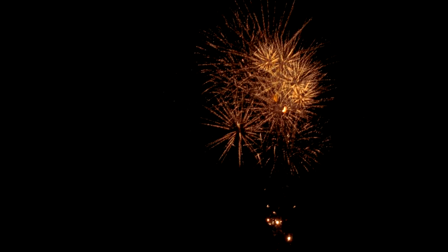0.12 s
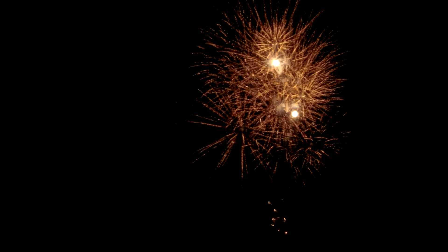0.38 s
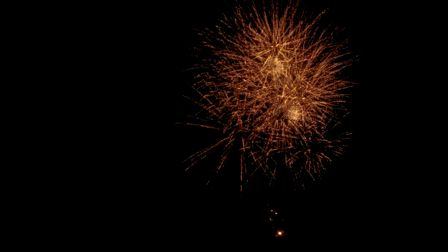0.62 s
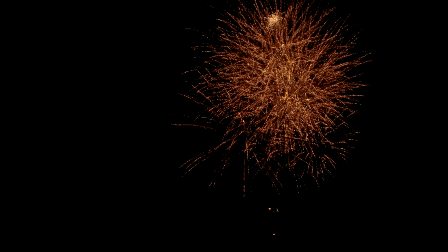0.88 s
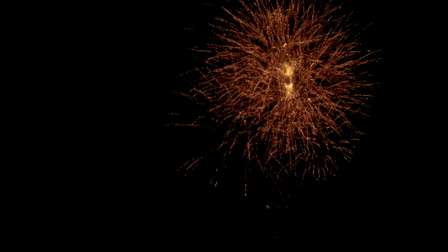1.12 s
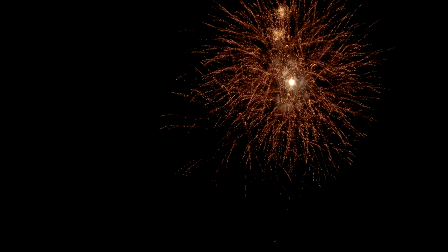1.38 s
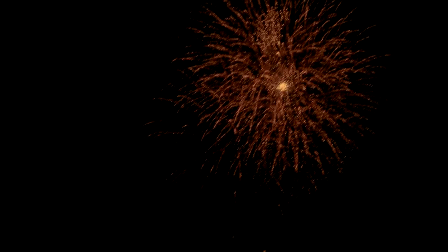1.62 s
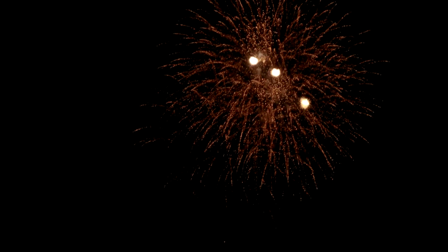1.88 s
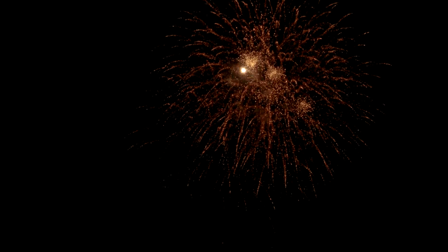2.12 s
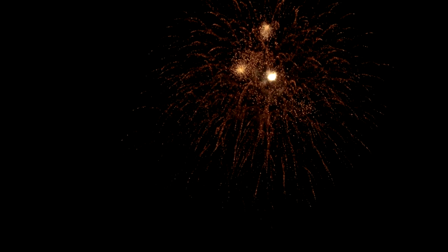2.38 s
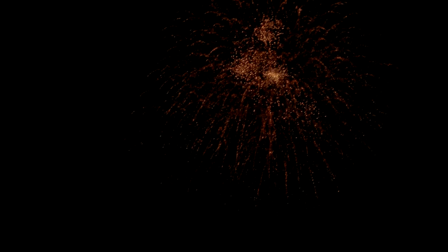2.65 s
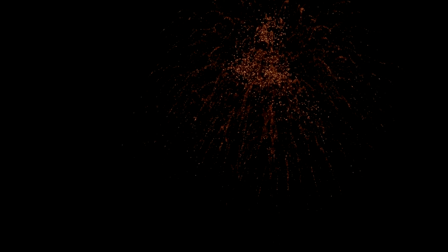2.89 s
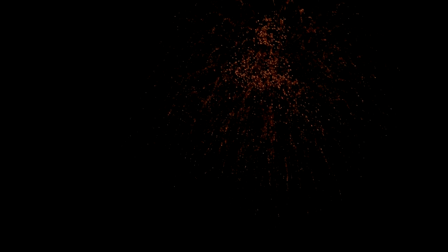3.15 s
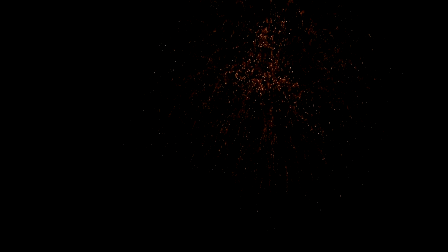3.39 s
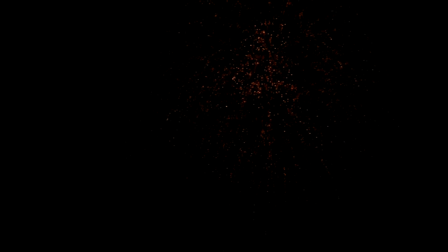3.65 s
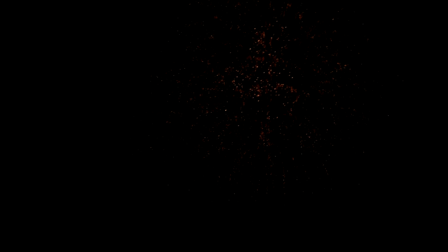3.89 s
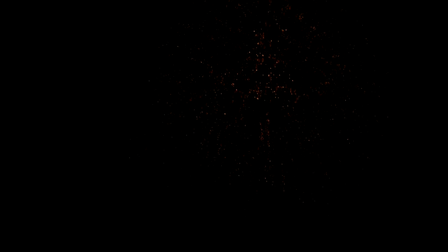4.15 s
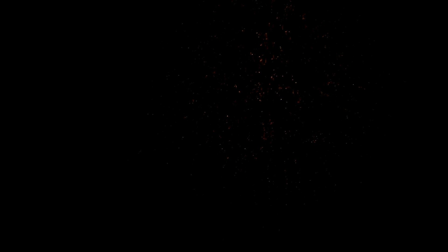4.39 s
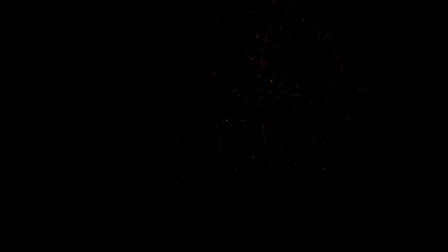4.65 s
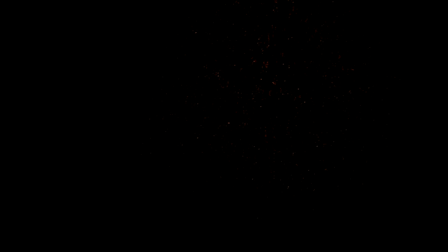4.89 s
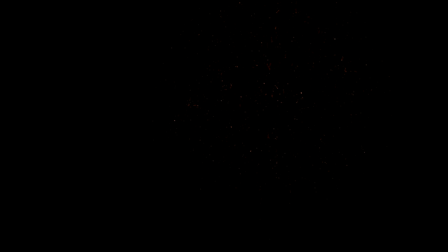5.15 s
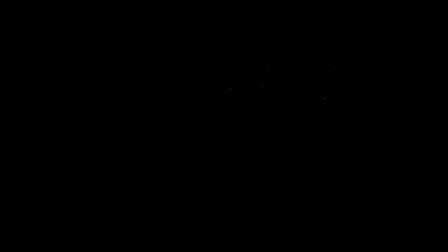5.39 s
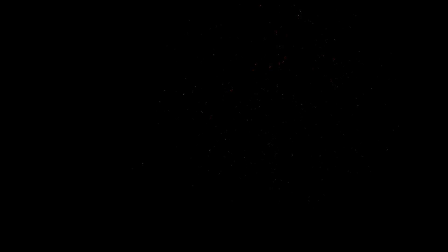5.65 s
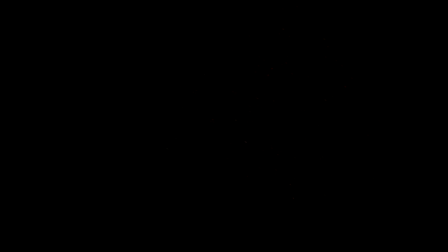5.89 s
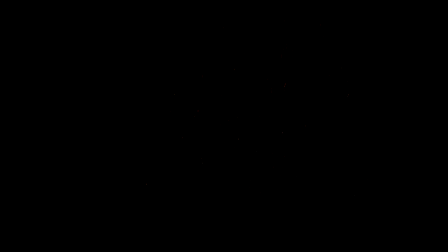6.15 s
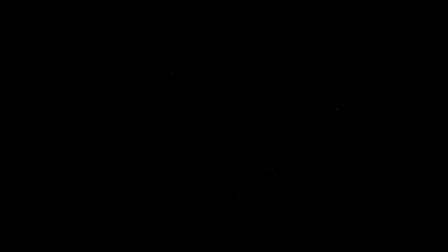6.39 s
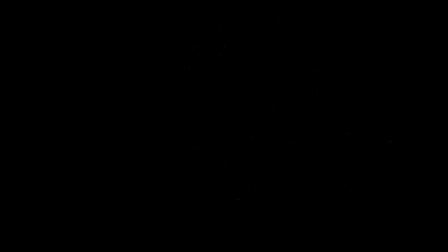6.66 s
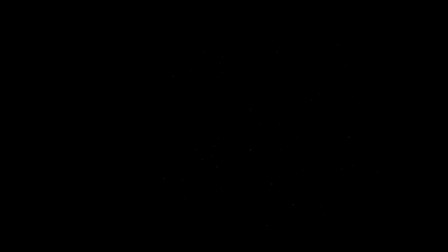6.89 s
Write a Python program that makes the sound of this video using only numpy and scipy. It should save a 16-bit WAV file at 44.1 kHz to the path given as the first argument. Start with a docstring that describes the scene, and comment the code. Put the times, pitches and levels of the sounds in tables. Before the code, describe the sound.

Open land among hills on a summer night, heard by a small stereo microphone. From 0 to 1.35 s, a low roll from earlier bursts fades under short raspy katydid buzzes, a faint pulsed cricket and a grainy high insect hiss. A thin, breathy whistle sinks in pitch from 0.5 s, joined by another near 0.95 s; both swell and stop at 1.36 s. Then overhead shells bang in rapid, uneven succession until about 2.7 s: short, hard, dry cracks, some clipping, each with a tight wall slap and scattered land echoes. Weaker bangs follow more sparsely, with strong ones near 3.7 and 4.3 s, the last at 4.9 s. Dull, soft thumps return from far slopes between 2.1 and 5.7 s. The hills' midrange roll slowly dies until 7 s, while katydid buzzes and the bright insect hiss grow clear again over a distant hush.

```python
"""Open land between echoing hills on a summer night: aerial shells burst far overhead.
Each bang is a short blast wave with a ground bounce, a slap from a wall close by, and land echoes shaped
from noise; dull thumps return from far slopes. Two narrow bands of noise whistle before the first bang.
Tooth strikes ringing in wings make katydids, pulsed noise a cricket, grainy treble noise an insect chorus.
Under it lie a long roll from the hills and a distant hush, heard by a small two-port microphone."""
import sys
import numpy as np
from scipy import signal
from scipy.fft import rfft, irfft, next_fast_len
from scipy.io import wavfile
from scipy.ndimage import uniform_filter1d

SR = 44100
rng = np.random.default_rng(int(sys.argv[2]) if len(sys.argv) > 2 else 0)


def to_linear_factor(level_db):
    """Convert decibel levels (scalar or array-like) to linear amplitude factors."""
    exponent = np.asarray(level_db, float) / 20
    return 10 ** exponent


def log_audio(samples):
    """Write samples as a 16-bit WAV file to the path given in sys.argv[1]."""
    # one column per channel
    frames = np.atleast_2d(samples).T
    # limit to full scale, then quantise
    limited = np.clip(frames, -1, 1)
    pcm = np.round(limited * 32767).astype(np.int16)
    wavfile.write(sys.argv[1], SR, pcm)


N = 309870  # samples in the scene


def evened(x):
    """Scales to rms 1."""
    return x / np.sqrt(np.mean(x ** 2) + 1e-20)


def read(hz, points, column=1):
    """Reads a spectrum table on a log-frequency axis."""
    rows = np.array(points)
    return np.interp(np.log(hz + 1), np.log(rows[:, 0] + 1), rows[:, column])


def curve(rows):
    """Reads a time table at every sample."""
    times, values = np.transpose(rows)
    return np.interp(np.arange(N) / SR, times, values)


def add(mix, s, sound):
    """Mixes a sound in from second s."""
    part = mix[max(round(s * SR), 0):][:len(sound)]
    part += sound[:len(part)]


def soften(x, ms):
    """Rounds sharp corners with one-pole smoothing."""
    r = np.exp(-1000 / (SR * max(ms, .005)))
    return signal.lfilter([1 - r], [1, -r], x)


def resonate(x, hz, width):
    """Rings like a struck body: a resonance of gain 1 that can follow a pitch curve."""
    turn = np.exp(2j * np.pi * np.cumsum(hz * np.ones(len(x))) / SR)
    r = np.exp(-np.pi * width / SR)
    # shift the pitch down to 0 Hz, smooth, and shift it back up
    return 2 * (turn * signal.lfilter([1 - r], [1, -r], x / turn)).real


def noise_pair(shape, same, count=N, size=1024):
    """Two noise channels with magnitude shape(Hz, s) and a given left-right likeness."""
    hop = size // 4
    frames = count // hop + 5
    hz = np.fft.rfftfreq(size, 1 / SR)
    a, b, c, d = rng.standard_normal((frames, len(hz), 4)).T
    like = np.clip(read(hz, same), -1, 1)[:, None]
    left = a + 1j * b
    right = like * left + np.sqrt(1 - like ** 2) * (c + 1j * d)
    pair = np.array([left, right]) * shape(hz[:, None], np.arange(frames) * hop / SR)
    return signal.istft(pair, nperseg=size, noverlap=size - hop)[1][:, :count]


def patchy(spectrum, patchy_db):
    """A spectrum with drifting louder and softer patches."""
    field = rng.standard_normal((N // 256 + 5, 513)).T
    field = evened(uniform_filter1d(uniform_filter1d(field, 8, 0), 8, 1))
    return lambda hz, s: to_linear_factor(read(hz, spectrum) + patchy_db * field)


def causal(points, size=1024):
    """The shortest click that has a given spectrum (minimum phase)."""
    log_gain = np.log(to_linear_factor(read(abs(np.fft.fftfreq(size, 1 / SR)), points)))
    return np.fft.ifft(np.exp(np.conj(signal.hilbert(log_gain)))).real[:size // 2]


# colour of the hush: (frequency [Hz], relative level [dB])
HUSH_COLOUR = [(15, -35), (25, -7.5), (223, -7.5), (575, -1), (1650, -9.5), (2690, -7), (3250, -12.5),
               (4030, -14.5), (5430, -18.5), (5880, -16.5), (7920, -16), (14800, -12.5), (16000, -11.5)]
# how alike left and right are: (frequency [Hz], likeness [0 to 1])
HUSH_LIKENESS = [(30, .3), (130, 0.41), (700, 0.44), (1500, 0.54), (3500, 0.2), (8000, 0.25), (15000, 0.89)]


def night():
    """A distant hush: shaped noise with small drifting patches."""
    return to_linear_factor(-56) * evened(noise_pair(patchy(HUSH_COLOUR, patchy_db=1.2), HUSH_LIKENESS))


# rise and fall of the insect hiss: (time [s], level [dB])
CHORUS_LEVEL = [(0.0, -54), (0.98, -58), (1.35, -56), (2.89, -69), (4.05, -63.5), (4.4, -64), (5.64, -56),
                (6.4, -52), (7.03, -51)]


def chorus():
    """Many far insects merge into a grainy high hiss: noise of uneven strength, ringing near 15 kHz."""
    grain_db = 2.1 * np.minimum(rng.exponential(1, (N, 2)).T, 6)
    ticks = to_linear_factor(grain_db) * rng.standard_normal((N, 2)).T
    ticks[1] = 0.3 * ticks[0] + 0.85 * ticks[1]  # the sides share some ticks
    hiss = np.array([resonate(resonate(side, 14600, 1700), 15200, 1800) for side in ticks])
    return to_linear_factor(curve(CHORUS_LEVEL)) * evened(hiss)


def cricket():
    """A thin, slightly fuzzy tone pulsed about forty times a second, its level wandering a little."""
    t = np.arange(N) / SR
    beat_drift, level_drift_db = evened(uniform_filter1d(rng.standard_normal((N, 2)), 9000, 0)).T
    beat = np.sin(2 * np.pi * (40 * t + 0.72 * beat_drift))
    pulses = np.clip(beat + 1.1, .35, 1)
    tone = evened(resonate(resonate(rng.standard_normal(N), 5879, 50), 5879, 50))
    return to_linear_factor(-73 + level_drift_db) * pulses * tone


# katydid buzzes: (middle [s], length [s], level before fading in and out [dB])
BUZZES = [(0.05, 0.11, -52.5), (.43, 0.14, -50.5), (.57, 0.13, -57), (.73, 0.14, -49.5), (.96, 0.12, -48),
          (1.08, 0.16, -57), (1.28, 0.27, -57), (1.45, 0.15, -53), (1.56, 0.13, -52), (1.78, 0.17, -61),
          (2.17, 0.15, -60), (2.85, .09, -63), (4.22, .09, -59), (4.93, 0.079, -61), (5.1, .12, -61),
          (5.61, .11, -57), (5.76, 0.036, -55), (5.92, 0.068, -57.5), (6.16, 0.16, -56.5),
          (6.29, 0.14, -50.5), (6.58, 0.24, -59), (6.72, 0.23, -53.5), (7.02, 0.076, -52)]
# ringing of the wing: (frequency [Hz], width [Hz], relative level [dB])
WING = [(9500, 1000, -6), (10500, 1500, 0), (11400, 1200, -2), (12400, 1000, -11)]


def katydid():
    """File teeth strike the wing at a steady rate during each buzz, and the wing rings."""
    out = np.zeros(N)
    for (middle, length, db), (a, b) in zip(BUZZES, rng.standard_normal((len(BUZZES), 2))):
        n = int(length * SR)
        teeth_per_s = 374 * (1 + 0.0027 * a)
        teeth = np.diff(np.floor(np.arange(n + 1) * teeth_per_s / SR))
        teeth = teeth * (1 + .4 * rng.standard_normal(n)) + .035 * rng.standard_normal(n)  # uneven, scratchy
        pitch = 1 + 0.014 * b
        wing = sum(to_linear_factor(level) * resonate(resonate(teeth, hz * pitch, width), hz * pitch, width)
                   for hz, width, level in WING)
        add(out, middle - n / SR / 2, to_linear_factor(db) * evened(wing) * signal.windows.tukey(n, .9))
    return out


def far_katydids():
    """Fainter neighbours buzz at random, each on its own tooth rate."""
    out, t = np.zeros(N), np.arange(N) / SR
    chances = rng.standard_normal((N, 3)).T
    for teeth_per_s, hz, chance in zip((366, 381, 392), (10700, 11200, 11700), chances):
        mood = evened(uniform_filter1d(uniform_filter1d(chance, 2200), 2200))
        singing = np.clip(mood - .7, 0, 1)
        teeth = np.diff(np.floor(t * teeth_per_s), prepend=0)
        out += singing * evened(resonate(resonate(teeth, hz, 900), hz, 1300))
    return to_linear_factor(-65) * out


# the bursts, heard in roll() and bangs():
# (time [s], strength [dB], blast length [ms], relative crack level [dB], ground bounce delay [ms])
BANGS = [(1.3536, -8, 3.05, -26.5, 2.86), (1.4453, -1.5, 1.75, -30, 1.43), (1.5024, 0, 0.96, -29, 0.23),
         (1.6128, -1, 2.52, -21, 0.96), (1.6413, 4, 0.73, -23, 0.39), (1.8693, -5.1, 1.75, -30.5, 1.2),
         (1.8904, 5.5, 1.45, -25, 1.09), (1.9127, -2, 1.36, -28.5, 1.34), (1.989, 1, 1.06, -30, 0.87),
         (2.0537, -3, 1.6, -23.5, 2.9), (2.1021, 5, 1.3, -25, 0.9), (2.296, -8.5, 2.68, -24.5, 0.65),
         (2.378, 4.5, 0.8, -20.5, 0.34), (2.5013, 5, 0.91, -24, 0.65), (2.577, -9, 0.68, -48, 0.24),
         (2.663, 7, 0.83, -16.5, 0.57), (2.95, -9.5, 1.32, -33.5, 3.36), (3.1879, -11.5, 2, -36, 2.23),
         (3.4823, -6, 1.08, -34, 0.38), (3.5658, -9.5, 1.5, -36, 0.7), (3.7117, 2.45, 1.115, -22.5, 2.14),
         (3.975, -9.5, 1.47, -33.5, 0.21), (4.3148, 2, 0.8, -19.5, 1.78), (4.3902, -13, 1.48, -30, 0.23),
         (4.403, -1.1, 0.88, -32, 1.9), (4.4071, -7, 1.6, -24, 0.45), (4.7388, -12.5, 1.59, -37, 2.27),
         (4.8129, -9.5, 1.86, -29.5, 0.23), (4.9104, -9.5, 1.37, -32, 0.29)]
# basic colour of the far roll: (frequency [Hz], relative level [dB])
ROLL_COLOUR = [(29, -91.5), (50, -17), (92, -24), (280, -6), (390, -4.5), (842, -13.5), (1310, -20.5),
               (1820, -28), (4000, -45), (5200, -38.5), (8800, -120)]
# how alike left and right are, in roll() and land(): (frequency [Hz], likeness [0 to 1])
ECHO_LIKENESS = [(60, 1), (500, 0.99), (1500, 0.94), (4000, 0.26), (10000, 0.13)]
ROLL_DB, ROLL_DB_PER_BURST_DB, ROLL_SWELL_S = -55, 0.28, 0.17
# time to fall 60 dB at 350 Hz, its doublings per octave, and extra level per octave
ROLL_T60_S, ROLL_T60_SLOPE, ROLL_TILT_DB = 12.54, -0.54, 3.5
BOOM_DB, BOOM_T60_S = 12.5, 5  # extra bass under 180 Hz and its own decay
# an earlier salvo still rolls: level, change per second, tilt per octave, extra bass
EARLIER_DB, EARLIER_DB_PER_S, EARLIER_TILT_DB, EARLIER_BOOM_DB = -53, -11.5, 4.5, 11


def roll():
    """Every burst sets the hills rolling: echoes swell, merge and die, the treble sooner than the middle."""
    field = patchy(ROLL_COLOUR, patchy_db=2.0)

    def shape(hz, s):
        octaves, deep = np.log2((hz + 50) / 400), hz < 180
        t60 = np.where(deep, BOOM_T60_S, ROLL_T60_S * 2 ** (ROLL_T60_SLOPE * octaves))
        earlier_db = EARLIER_DB + EARLIER_DB_PER_S * s + EARLIER_TILT_DB * octaves + EARLIER_BOOM_DB * deep
        power = to_linear_factor(earlier_db) ** 2
        for start, db, length, *_ in BANGS:
            age = np.maximum(s - start, 0)
            fresh_db = ROLL_DB + ROLL_DB_PER_BURST_DB * db + ROLL_TILT_DB * octaves + BOOM_DB * deep
            swell = 1 - np.exp(-age / ROLL_SWELL_S)
            power = power + length * swell * to_linear_factor(fresh_db - 60 * age / t60) ** 2
        return field(hz, s) * np.sqrt(power)

    # a steady stretch of the basic colour sets the scale
    still = noise_pair(lambda hz, s: to_linear_factor(read(hz, ROLL_COLOUR)), ECHO_LIKENESS, count=SR)
    return noise_pair(shape, ECHO_LIKENESS) / np.sqrt(np.mean(still ** 2))


# two climbing shells: (start [s], end [s], start pitch [Hz], sink [Hz per s], level nearing the end [dB])
WHISTLES = [(.5, 1.36, 4320, 1030, -64.5), (.95, 1.36, 4190, 1230, -68)]


def whistle(start, end, start_hz, sink_hz, end_db):
    """A thin, breathy tone (noise in a narrow resonance) that sinks and swells as the shell climbs."""
    t = np.arange(N) / SR
    sputter_db = 3.2 * evened(uniform_filter1d(rng.standard_normal(N), 700))
    waver_hz = 22 * evened(uniform_filter1d(rng.standard_normal(N), 2500))
    hz = start_hz - sink_hz * np.clip(t - start, 0, end - start) + waver_hz
    air = resonate(resonate(rng.standard_normal(N), hz, 130), hz, 180)
    level_db = end_db - 15 * np.abs(end - t) + sputter_db  # swells 15 dB per second
    fade_in = np.clip((t - start) / 0.071, 0, 1)
    return to_linear_factor(level_db) * evened(air) * fade_in * (t < end)


# colour of the crack: (frequency [Hz], relative level [dB])
CRACK_COLOUR = [(300, -53.5), (800, 4), (1500, 6), (3000, 2.5), (4500, -9.5), (7000, -15), (11000, -30.5),
                (16000, -53)]
MIDDLE_CRACK_DB = -25  # sharpness is counted from here
# high bursts (late bounce) slap the wall less, and the sharpest cracks lose most on it
WALL_DB, WALL_DB_PER_MS, WALL_DB_PER_CRACK_DB = -7, -2.5, -0.21
# a front that stays steep snaps: the sharper the crack and the shorter the bounce, the brighter
SNAP_DB, SNAP_DB_PER_CRACK_DB, SNAP_DB_PER_MS = -30, 3.3, -2


def bangs():
    """Blast waves jump up, slide to suction and jump back; returns the sound at ports, wall and land."""
    direct, toward_wall, *snaps = np.zeros((4, N))
    toward_land = np.zeros((5, N))  # bursts in other parts of the sky stir other echoes
    ms = np.arange(800) / SR * 1000
    click = causal(CRACK_COLOUR)
    click = click / np.linalg.norm(click)
    turbulence = rng.standard_normal((len(BANGS), 1200))
    for k, ((s, db, length, crack_db, bounce), gusts) in enumerate(zip(BANGS, turbulence)):
        wave = np.where(ms < length, 1 - 2 * ms / length, 0)
        wave = to_linear_factor(db) * soften(soften(wave, .14), .14)  # distance rounds the corners
        bounced = wave + .7 * np.interp(ms - bounce, ms, wave, left=0)

        # turbulent air frays the front into a crack
        frayed = gusts[:800] * np.exp(-ms / (.7 + .45 * length))
        frayed[0] += 6
        crack = to_linear_factor(crack_db + 25.5) * np.convolve(frayed / np.linalg.norm(frayed), click)[:800]

        sharp_db = crack_db - MIDDLE_CRACK_DB
        wall_db = WALL_DB + WALL_DB_PER_MS * bounce + WALL_DB_PER_CRACK_DB * sharp_db
        snap_db = SNAP_DB + SNAP_DB_PER_CRACK_DB * sharp_db + SNAP_DB_PER_MS * bounce
        snap = to_linear_factor(snap_db) * soften(gusts[800:].reshape(2, 200), .035) * np.exp(-ms[:200] / .7)

        add(direct, s, bounced)
        add(direct, s + .0003, crack)
        for port, grit in zip(snaps, snap):  # the snap frays differently at each port
            add(port, s + .0005, grit)
            add(port, s + .0157, to_linear_factor(wall_db + 1) * grit[:30])  # its glint off the wall
        add(toward_wall, s, to_linear_factor(wall_db) * (bounced + 3 * crack))

        echoes = toward_land[k % len(toward_land)]
        add(echoes, s, 0.69 * length ** 1.44 * wave)  # big slow blasts fill the land more
        add(echoes, s, to_linear_factor(0.43 * crack_db + 12.5) * click)
        add(echoes, s, to_linear_factor(snap_db - 4) * np.array([1, .3]))
    return direct + np.array(snaps), toward_wall, toward_land


def wall(x):
    """The slap comes back inverted between two weaker edge waves, with a small sharp glint."""
    ms = np.arange(1000) / SR * 1000 - 16.1  # time around the middle of the slap
    taps = -to_linear_factor(-28) * np.cos(2 * np.pi * .62 * ms) * np.exp(-(ms / .9) ** 2)
    add(taps, .0156, -to_linear_factor(np.array([-11])))  # the glint
    return signal.oaconvolve(x, taps)[:N]


# scatter from near trees, roofs and ground, then from far land; t60 is the time to fall 60 dB:
# (frequency [Hz], quick relative level [dB], quick t60 [s], slow relative level [dB], slow t60 [s])
LAND_ECHO = [(77.4, -32.5, 0.9, -19, 1.4), (200, -31, 1, -29.5, 0.85), (417, -2, 0.13, -17.5, 1.4),
             (930, -2, 0.23, -26, 1.46), (2310, -3, 0.15, -22.5, 1.4), (5900, -3, 0.1, -20, 0.85),
             (14400, 1, 0.26, -47, .4)]
SLOPE_S, SLOPE_SPREAD_S, SLOPE_GAIN = .275, .05, 0.73  # a facing slope swells the echo for a moment


def land(x):
    """A quick scatter from near things over a slow roll from far ones, lumpy in time."""
    lumps = evened(uniform_filter1d(rng.standard_normal(2 * SR // 64 + 5), 4))

    def shape(hz, s):
        near = to_linear_factor(read(hz, LAND_ECHO) - 60 * s / read(hz, LAND_ECHO, column=2))
        far = to_linear_factor(read(hz, LAND_ECHO, column=3) - 60 * s / read(hz, LAND_ECHO, column=4))
        far = far * (1 + SLOPE_GAIN * np.exp(-((s - SLOPE_S) / SLOPE_SPREAD_S) ** 2))
        return np.hypot(near, far) * to_linear_factor(2.5 * lumps - 47.5)

    tail = noise_pair(shape, ECHO_LIKENESS, count=2 * SR, size=256)
    tail *= np.clip(np.arange(2 * SR) / (.005 * SR), 0, 1)  # 5 ms fade-in
    return signal.fftconvolve(x[None], tail, axes=1)[:, :N]


# dull returns from far slopes: (time [s], peak of the swell [dB], pitch [Hz])
THUMPS = [(2.081, -17.5, 302), (2.512, -29, 550), (2.822, -30.5, 266), (2.938, -21, 347), (3.356, -40, 270),
          (3.457, -50, 270), (4.248, -32.5, 340), (4.681, -32.5, 322), (5.086, -29.5, 424),
          (5.18, -32.5, 464), (5.22, -34.5, 404), (5.25, -39, 303), (5.654, -37.5, 306)]


def thumps():
    """Each far return is a few soft low cycles that swell for 3 ms and die away."""
    out, ms = np.zeros(N), np.arange(1300) / SR * 1000
    swell = ms / 3 * np.exp(1 - ms / 3)
    for s, db, hz in THUMPS:
        add(out, s, -to_linear_factor(db) * np.sin(2 * np.pi * hz * ms / 1000) * swell)
    return out


def scene():
    """All sources as they reach the two ports."""
    insects = katydid() + far_katydids() + cricket()
    whistles = sum(whistle(*row) for row in WHISTLES)
    direct, toward_wall, toward_land = bangs()
    near = direct + wall(toward_wall) + thumps() + whistles + insects
    return near + sum(map(land, toward_land)) + roll() + night() + chorus()


def low_pass(x):
    """Removes everything above the highest recorded frequency."""
    return signal.sosfilt(signal.butter(12, 16780, fs=SR, output="sos"), x)


# phase between the ports: (frequency [Hz], left ahead of right [radians])
PORT_TURN = [(0, 0), (1500, -.1), (3300, -.3), (5200, -.6), (6800, -2.8), (10000, -4.3), (13700, -3.7),
             (16400, -5)]
# loudness between the ports: (frequency [Hz], left minus right [dB])
PORT_TILT = [(60, .2), (1500, .1), (3000, .6), (5500, 1.5), (9000, 2.3), (15000, 2.3)]
# rumble of the two capsules: (frequency [Hz], relative level [dB])
SELF_NOISE = [(20, -73.5), (40, -76.5), (80, -78), (200, -105), (500, -130)]


def record(dry):
    """Ports shift and tilt the treble, capsules cut the bass with a bump and rumble, full scale clips."""
    size = next_fast_len(N)
    hz = np.fft.rfftfreq(size, 1 / SR)
    turn = np.interp(hz, *np.transpose(PORT_TURN))
    ports = [to_linear_factor(side * read(hz, PORT_TILT) / 2) * np.exp(1j * (side - 1) * turn / 2)
             for side in (1, -1)]  # left, right
    capsule_hz, bump = 150, 1.2
    w = 1j * hz / capsule_hz
    capsule = w ** 2 / (1 + w / bump + w ** 2)
    capsule *= to_linear_factor(-38 * np.clip((hz - 15900) / 300 + .5, 0, 1))  # the top drops away around 15.9 kHz
    out = irfft(rfft(dry, size) * ports * capsule, size)[:, :N]
    rumble_likeness = [(20, 0.17), (500, 0.45)]  # (frequency [Hz], likeness [0 to 1])
    out += noise_pair(lambda hz, s: to_linear_factor(read(hz, SELF_NOISE)), rumble_likeness, size=4096)
    return low_pass(np.clip(out, -1, 1))


dry = scene()
out = record(dry)
log_audio(out)
```